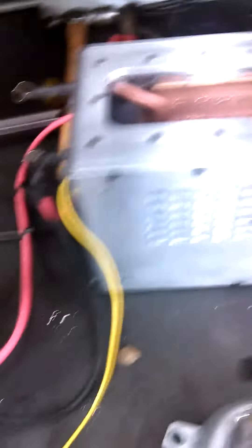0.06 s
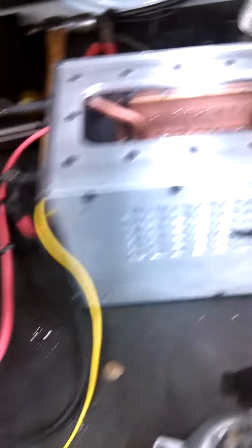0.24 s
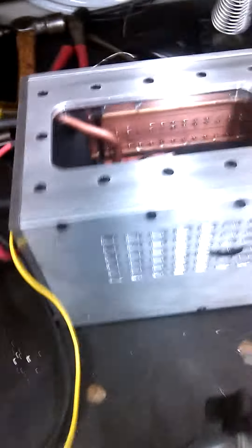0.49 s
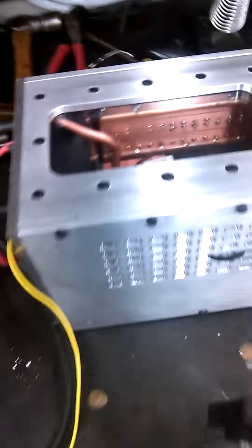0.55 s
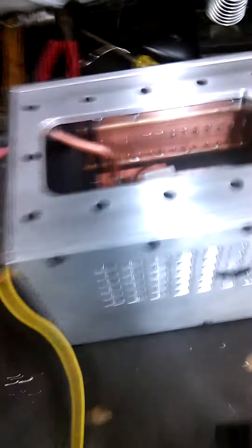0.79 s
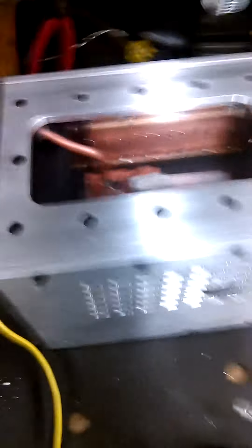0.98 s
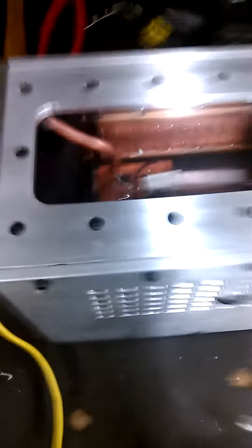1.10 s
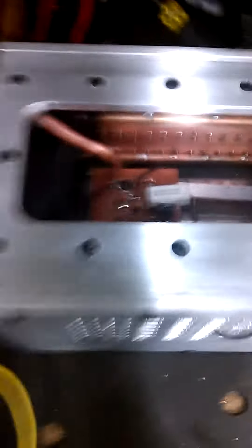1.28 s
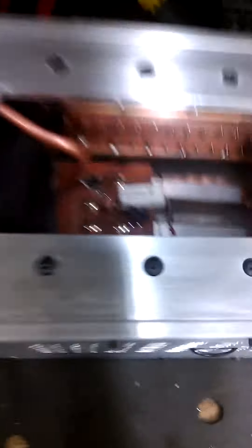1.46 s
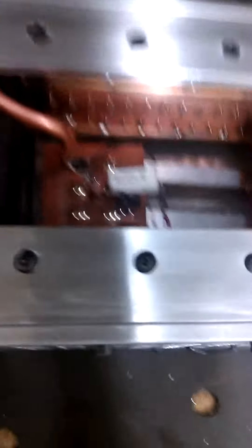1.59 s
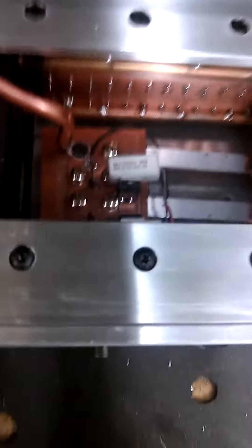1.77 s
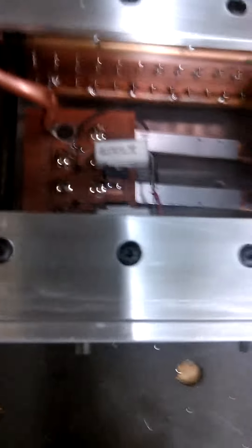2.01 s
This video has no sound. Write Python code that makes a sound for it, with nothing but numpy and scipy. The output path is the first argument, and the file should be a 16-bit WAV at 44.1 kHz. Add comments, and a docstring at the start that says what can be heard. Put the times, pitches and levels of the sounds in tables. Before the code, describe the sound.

A small fast cooling fan inside a metal electrical case whines at one steady pitch over rushing vent air and low rumble; a loud pop comes near the start, as the close handheld microphone drifts nearer.

```python
"""Inside the metal case of a heater a fast seven-blade cooling fan whines while the microphone drifts closer.
The whine is sines locked to the shaft, the blade tone blurred by turbulence, plus faint lines at steady pitch.
Air rushes through the vents as patchy coloured noise over a low rumble, while a hum near 58 Hz swells and
wavers. Once the microphone input jumps: a pop, a moment of lost sensitivity and the ringing of the low-cut
filter. Two faint rustles of treble noise come close to the microphone later on."""
import sys
import numpy as np
from scipy import signal
from scipy.fft import rfft, irfft, next_fast_len
from scipy.io import wavfile
from scipy.ndimage import uniform_filter1d, map_coordinates

SR = 44100
rng = np.random.default_rng(int(sys.argv[2]) if len(sys.argv) > 2 else 0)


def int16_out(signal):
    """Quantize to a 16-bit WAV file."""
    q = np.round(np.clip(np.atleast_2d(signal).T, -1, 1) * 32767)
    wavfile.write(sys.argv[1], SR, q.astype(np.int16))


def gain_from_db(level_db):
    """Convert decibel levels to linear amplitude factors (20 dB per decade)."""
    decades = np.asarray(level_db, float) / 20
    return 10 ** decades


N = 90404
T = np.arange(N) / SR  # seconds


def unit(x):
    """Scale to rms 1."""
    return x / np.sqrt(np.mean(x ** 2) + 1e-20)


def curves(rows):
    """One value per sample for each column after the time, joined by straight lines."""
    s, *columns = np.transpose(rows)
    return [np.interp(T, s, column) for column in columns]


def wobble(rate):
    """A smooth random curve through normally distributed knots, rate knots a second."""
    knots = rng.standard_normal(int(N * rate / SR) + 4)
    return map_coordinates(knots, [T * rate])


def filtered(x, response):
    """Multiply the spectrum of x by a response given as a function of frequency in Hz."""
    m = next_fast_len(N + SR // 2)
    return irfft(rfft(x, m) * response(np.fft.rfftfreq(m, 1 / SR)), m)[..., :N]


def rush(spectrum, patchy_db):
    """Turbulent air: noise of rms 1, patchy in time and pitch, coloured by (Hz, relative dB per Hz)."""
    z = signal.stft(rng.standard_normal(N), nperseg=512)[2]
    across_pitch = uniform_filter1d(rng.standard_normal(z.shape), 6, 0)
    patches = unit(uniform_filter1d(across_pitch, 14, 1))
    x = signal.istft(z * gain_from_db(patchy_db * patches), nperseg=512)[1][:N]
    f, db = np.transpose([(1, -120), *spectrum, (SR, -120)])
    return unit(filtered(x, lambda hz: gain_from_db(np.interp(np.log(hz + 1), np.log(f), db))))


def tone(turns, db, unsteady_db):
    """A sine on a running phase in turns, its rms level in dB wandering a little."""
    level = np.sqrt(2) * gain_from_db(db + unsteady_db * wobble(12.07))
    return level * np.sin(2 * np.pi * (turns + rng.random()))


# How far the microphone has come round from the side of the case to its top opening.
# Each row: time in seconds, share of the way from 0 to 1.
MIC_POSITION = [(0, .02), (.7, 0.12), (1.0, 0.2), (1.3, 0.84), (1.6, 1), (2.05, 1)]


def over_opening():
    """Share of the way to the top opening at every sample; 0 is beside the case."""
    return np.clip(curves(MIC_POSITION)[0], 0, 1)


# The fan as heard from the moving microphone.
# Each row: time in seconds, then rms levels in dB of the blade tone, its octave and shaft order 12.
FAN_LEVELS = [(0, -38.5, -79, -66), (.35, -37.5, -66, -65.5), (.5, -40, -81, -65), (.75, -38, -71, -65.5),
              (.95, -36.5, -61.5, -57.5), (1.15, -34.5, -59.5, -60), (1.35, -36, -61.5, -58.5),
              (1.6, -34.5, -59, -59.5), (1.8, -34, -59, -58.5), (2.05, -35, -61, -58.5)]
# The pitch of the blade tone. Each row: time in seconds, frequency in Hz.
BLADE_PITCH = [(0, 885.5), (1.15, 885.1), (1.6, 884.4), (2.05, 884.2)]


def fan():
    """Seven blades pass per shaft turn and sound the blade tone; turbulence shakes it into a noisy skirt."""
    blades = 7
    skirt_db, skirt_hz = -20, 45.2  # of each quadrature against the tone; half the knot rate
    flutter_db = .3
    order_8_db, order_16_db = -63, -69
    blade_db, octave_db, order_12_db = curves(FAN_LEVELS)
    shaft_turns = np.cumsum(curves(BLADE_PITCH)[0]) / SR / blades

    skirt = gain_from_db(skirt_db) * (wobble(2 * skirt_hz) + 1j * wobble(2 * skirt_hz))
    blade_level = np.sqrt(2) * gain_from_db(blade_db + flutter_db * wobble(8))
    blade_tone = blade_level * np.real((1 + skirt) * np.exp(2j * np.pi * blades * shaft_turns))
    orders = ((14, octave_db), (12, order_12_db), (8, order_8_db), (16, order_16_db))
    return blade_tone + sum(tone(order * shaft_turns, db, 1.2) for order, db in orders)


# Faint whine lines: blade harmonics near 2654, 3538 and 4423 Hz, and other faint tones, all at steady pitch.
# Each row: frequency in Hz, rms level in dB at the side, rms level in dB over the opening.
WHINE_LINES = [(2654, -88, -79), (2805, -88, -80), (2850, -78, -81), (3024, -82, -73), (3112, -88, -82),
               (3235, -88, -79), (3327, -85, -78), (3538, -79, -78), (3629, -81, -80), (4423, -90, -83),
               (4910, -92, -83)]


def faint_whine():
    """Sines of steady pitch whose levels follow the microphone from the side to the opening."""
    share = over_opening()
    return sum(tone(hz * T, side_db + (top_db - side_db) * share, 1.7)
               for hz, side_db, top_db in WHINE_LINES)


# The low rumble of the airflow. Each row: frequency in Hz, relative level in dB per Hz.
RUMBLE_COLOUR = [(20, 5), (45, -2.5), (58, -7), (75, -5), (88, -8), (105, -0.5), (135, -5.5), (170, -7),
                 (200, -13), (260, -35)]


def rumble():
    """Low noise of the airflow, slightly patchy."""
    return gain_from_db(-44.5) * rush(RUMBLE_COLOUR, patchy_db=1.2)


# A low hum near 58 Hz that swells and fades. Each row: time in seconds, rms level in dB.
HUM_SWELLS = [(0, -47), (.12, -49.5), (.36, -43), (.44, -57), (.56, -44.5), (.68, -47.5), (.75, -44.5),
              (.82, -50), (1.08, -51.5), (1.17, -46), (1.24, -56), (1.42, -42), (1.54, -52), (1.64, -47),
              (1.78, -49.5), (1.86, -42.5), (1.92, -53), (2.05, -54)]


def hum():
    """A low hum carried by a sine that wavers in pitch, its level swelling and fading."""
    centre_hz, waver_hz = 58, 3.5
    turns = np.cumsum(centre_hz + waver_hz * wobble(10)) / SR
    return tone(turns, curves(HUM_SWELLS)[0], 0.68)


# The body of the rush through the vents. Each row: frequency in Hz, relative level in dB per Hz.
RUSH_COLOUR = [(120, -16.5), (210, -7.5), (280, 0.5), (330, -3.5), (480, -3.5), (570, -7.5), (690, -8),
               (790, -6.5), (920, -9), (970, -11.5), (1080, -11.5), (1240, -14), (1380, -13), (1550, -16),
               (1700, -21), (1950, -22.5), (2300, -28), (2600, -50.5)]


def vent_rush():
    """Middle-range noise of the airflow, its level drifting slowly."""
    return gain_from_db(-44 + 0.53 * wobble(3)) * rush(RUSH_COLOUR, patchy_db=-0.23)


# Hiss close beside the case. Each row: frequency in Hz, relative level in dB per Hz.
SIDE_COLOUR = [(1350, -37.5), (2300, -4.5), (2760, -2.5), (2980, -4.5), (3550, -5), (3860, -7.5),
               (4360, -9.5), (4930, -18.5), (5320, -11.5), (6000, -12.5), (6530, -13.5), (7260, -16.5),
               (7840, -22), (8790, -18.5), (10600, -23.5), (11900, -23), (14200, -25)]
# Hiss over the top opening. Each row: frequency in Hz, relative level in dB per Hz.
TOP_COLOUR = [(1350, -29), (2300, -2), (2440, -7.5), (2780, -4.5), (2910, -2.5), (3100, -4), (3170, -8.5),
              (3630, -5), (3720, -7.5), (4890, -6), (5280, -9), (5910, -12), (7260, -12), (8990, -17.5),
              (10300, -21), (12000, -22), (14200, -25.5)]


def hiss():
    """Treble of the airflow, changing colour with the microphone's angle to the case."""
    share = over_opening()
    # square roots crossfade the two hisses by power
    side = gain_from_db(-62) * np.sqrt(1 - share) * rush(SIDE_COLOUR, patchy_db=0.55)
    top = gain_from_db(-61) * np.sqrt(share) * rush(TOP_COLOUR, patchy_db=1.8)
    return gain_from_db(0.52 * wobble(15)) * (side + top)


# Jumps of the microphone input; the second is the big one.
# Each row: time in seconds, size of the step in linear amplitude ahead of the low-cut.
INPUT_JUMPS = [(.22032, .06), (.2209, .91), (.2331, -.015), (.2411, .009)]


def pop_offset():
    """The input steps to a new offset at each jump, within one sample, and stays there."""
    return sum(size * np.clip((T - s) * SR, 0, 1) for s, size in INPUT_JUMPS)


def pop_sensitivity():
    """The capsule loses sensitivity at the big jump and recovers exponentially."""
    loss_db, recover_s = -15, 0.011
    after = T - INPUT_JUMPS[1][0]
    return gain_from_db(loss_db * (after > 0) * np.exp(-np.abs(after) / recover_s))


# Faint rustles near the microphone.
# Each row: time of the peak in seconds, level in dB, time from peak to 1/e in seconds.
RUSTLE_PUFFS = [(1.117, -59, .003), (1.365, -60, .007)]
# The colour of the rustles. Each row: frequency in Hz, relative level in dB per Hz.
RUSTLE_COLOUR = [(1500, -30), (2500, 0), (6000, -3), (9000, -20)]


def rustles():
    """Short soft puffs of treble noise under bell-shaped envelopes."""
    envelope = sum(gain_from_db(db) * np.exp(-((T - s) / length) ** 2) for s, db, length in RUSTLE_PUFFS)
    return envelope * rush(RUSTLE_COLOUR, patchy_db=0)


def scene():
    """All sound at the capsule, numbed for a moment by the pop, plus the jumping offset."""
    whine = fan() + faint_whine()
    air = rumble() + hum() + vent_rush() + hiss()
    return (pop_sensitivity() * (whine + air + rustles()) + pop_offset())[None]


# The microphone's low-cut filter in three high-pass sections; it rings after the pop.
# Each row: corner frequency in Hz, Q.
LOW_CUT_SECTIONS = [(35.2, 2.46), (54.2, 2.34), (89.3, .8)]


def low_cut(x):
    """Causal second-order high-passes in series, turning the input step into a ringing pop."""
    for hz, q in LOW_CUT_SECTIONS:
        w = 2 * np.pi * hz
        b, a = signal.bilinear([1, 0, 0], [1, w / q, w ** 2], SR)
        x = signal.lfilter(b, a, x)
    return x


def soft_clip(x):
    """Bend peaks smoothly towards a ceiling in linear amplitude."""
    ceiling, knee = 1.12, 4
    return x / (1 + np.abs(x / ceiling) ** knee) ** (1 / knee)


def band_limit(x):
    """Fall steeply around the top frequency to a hundredth of the amplitude."""
    top_hz, slope_hz = 14280, 60
    return filtered(x, lambda hz: np.clip((top_hz - hz) / slope_hz + .5, .01, 1))


def roll_off(x):
    """The treble ends steeply here."""
    return signal.sosfilt(signal.butter(12, 15100, fs=SR, output="sos"), x)


def record(dry):
    """The microphone chain: low-cut, soft clipping, band limit."""
    mix = band_limit(soft_clip(low_cut(dry)))
    return roll_off(mix)


dry = scene()
out = record(dry)
int16_out(out)
```